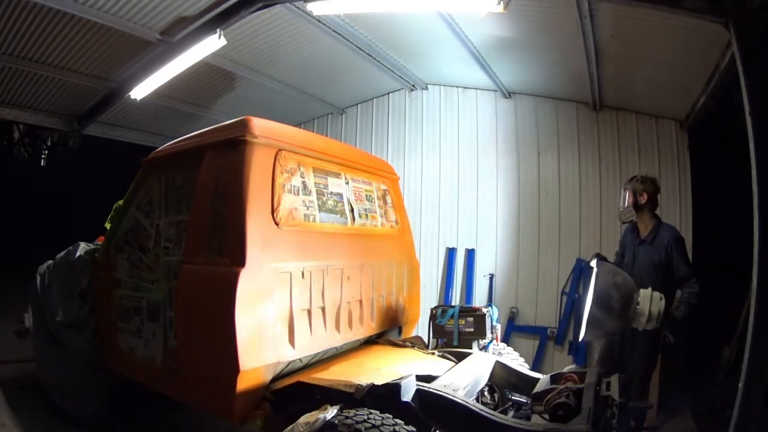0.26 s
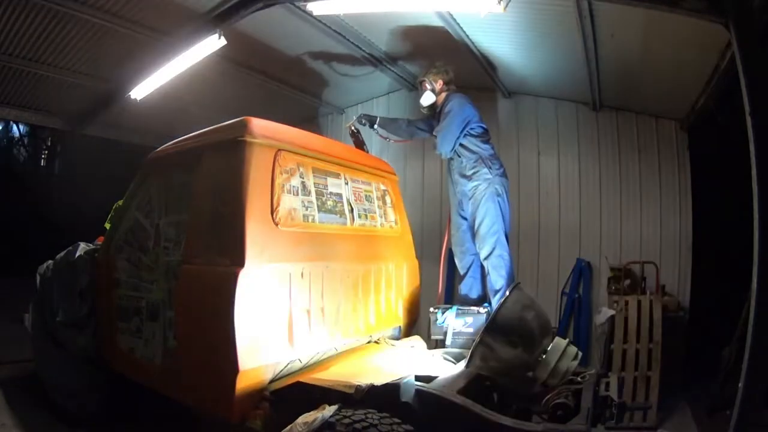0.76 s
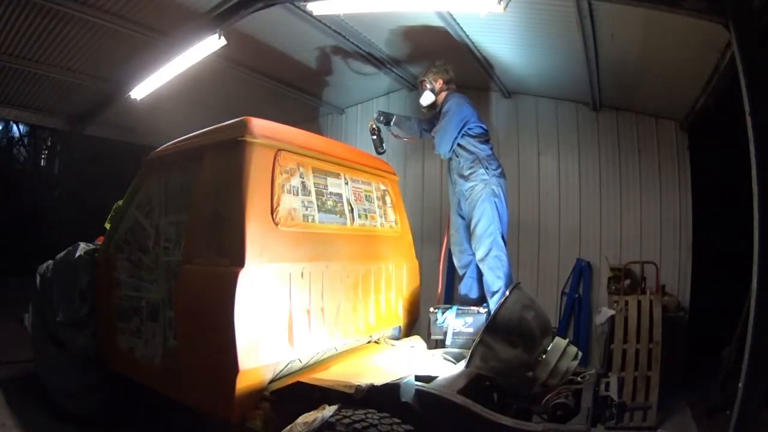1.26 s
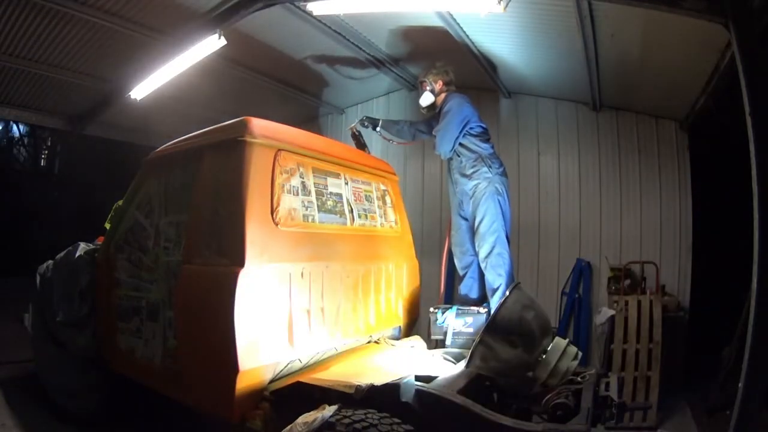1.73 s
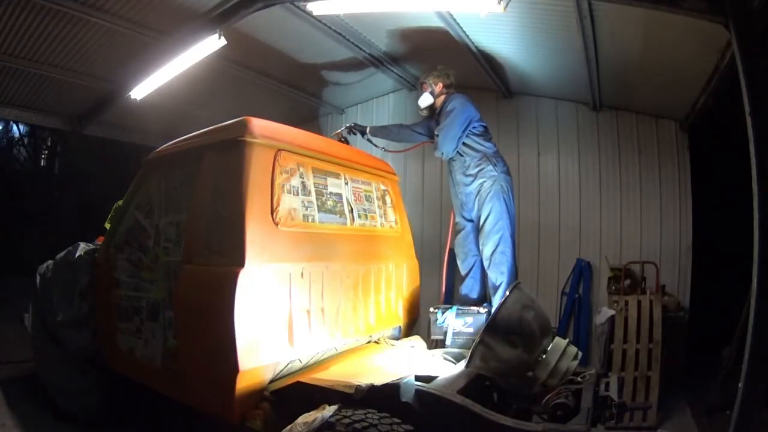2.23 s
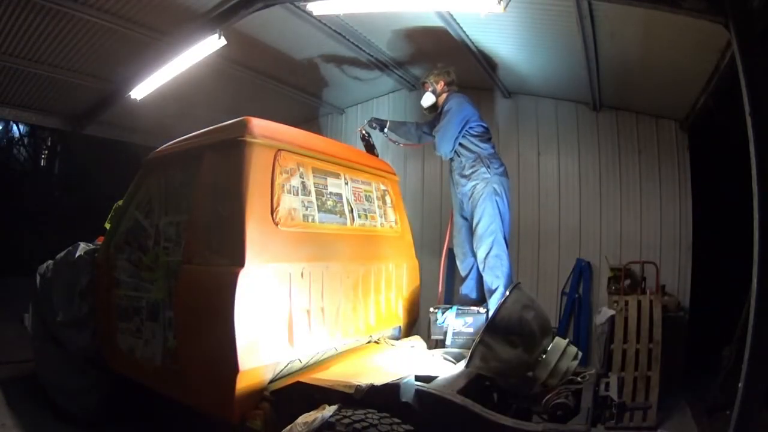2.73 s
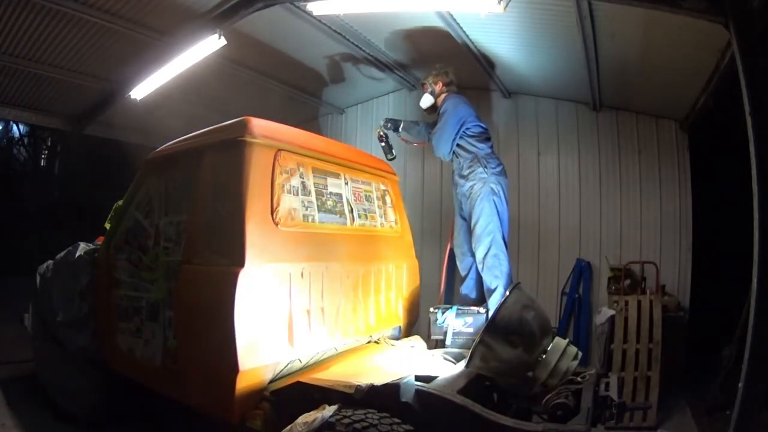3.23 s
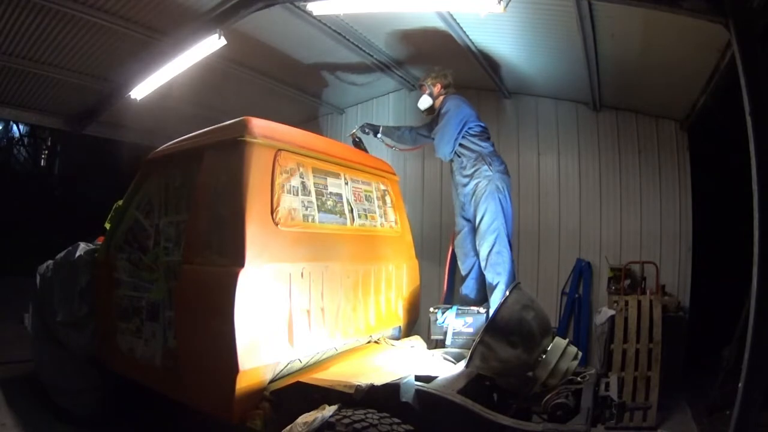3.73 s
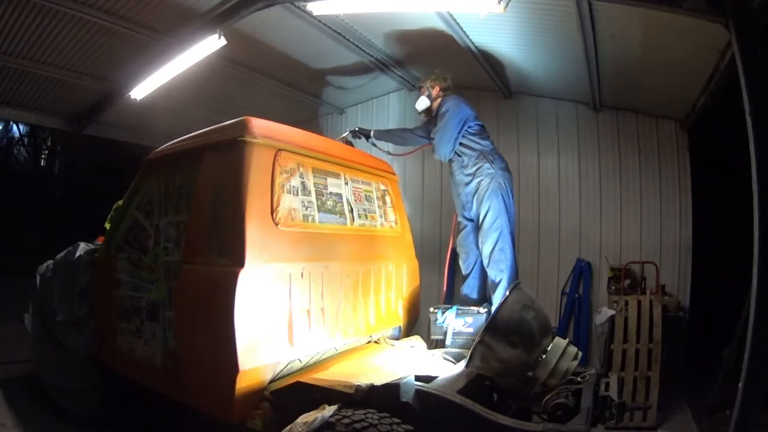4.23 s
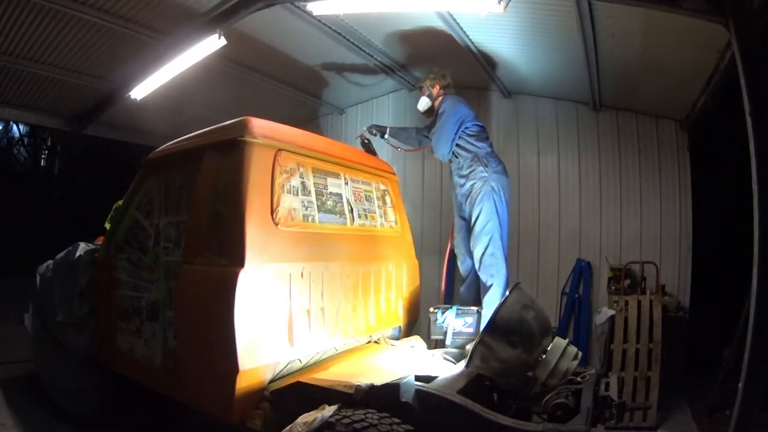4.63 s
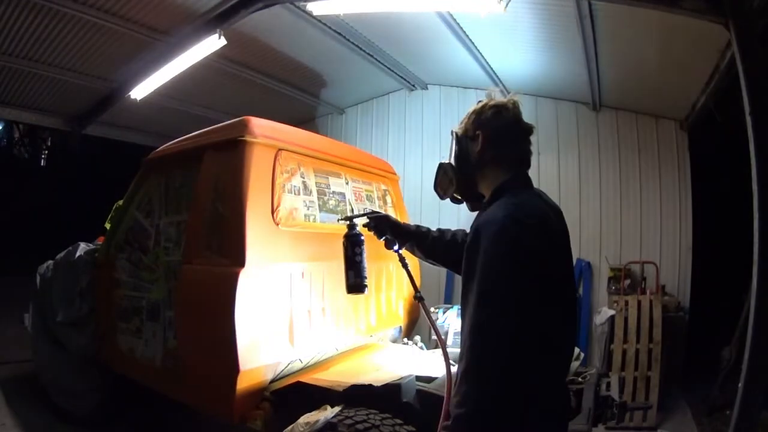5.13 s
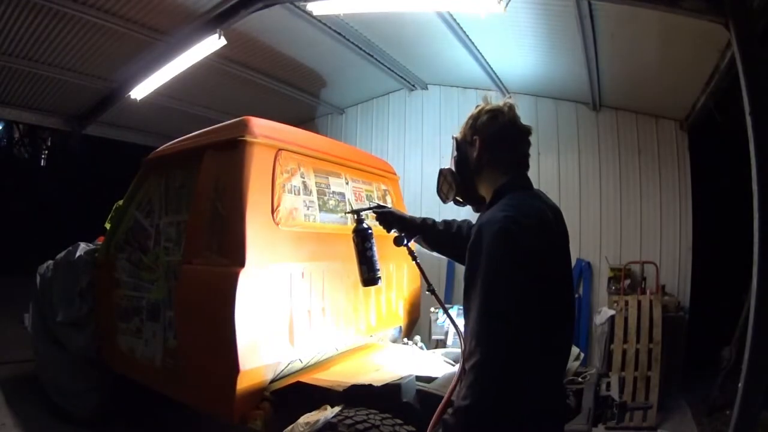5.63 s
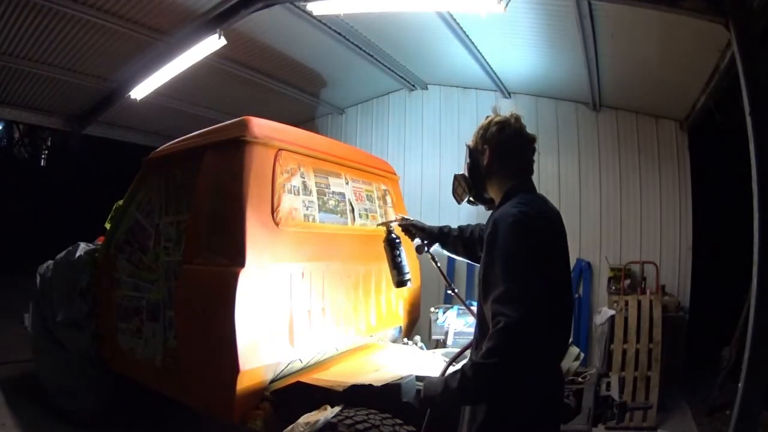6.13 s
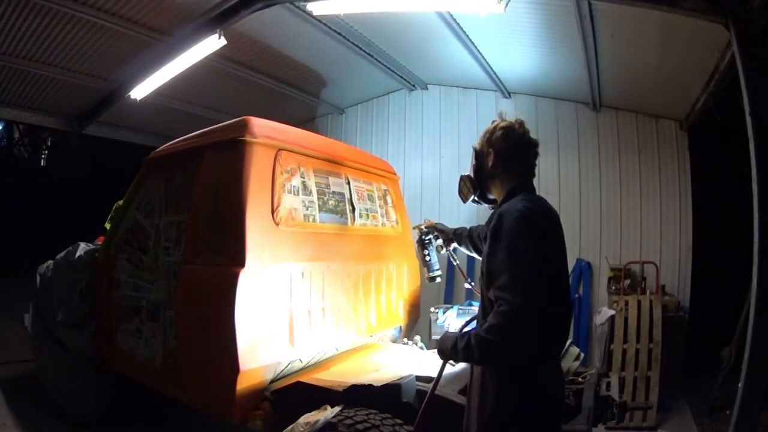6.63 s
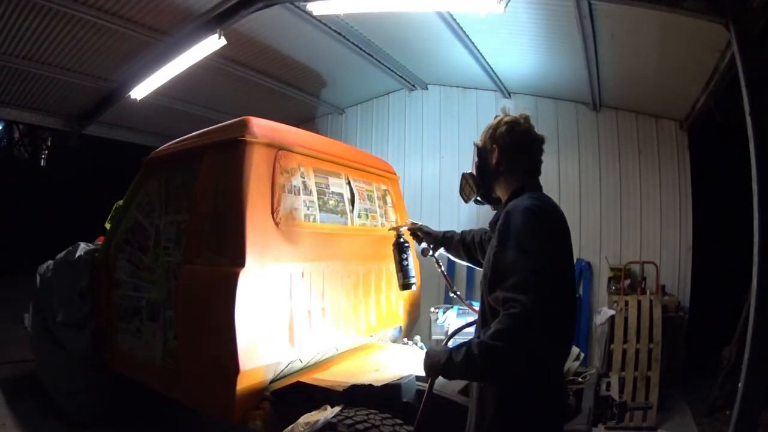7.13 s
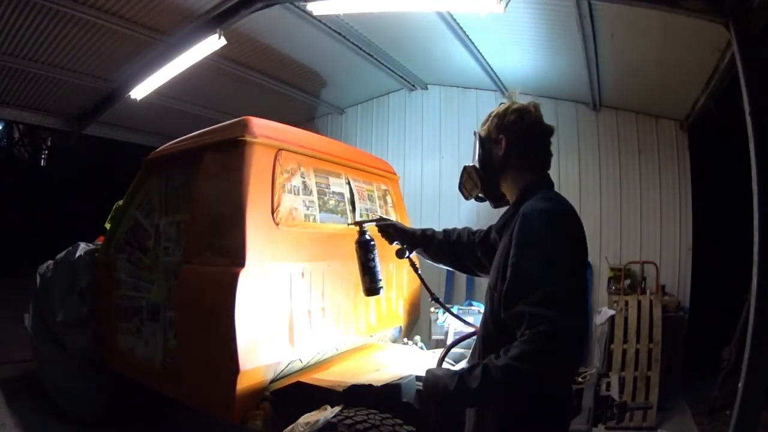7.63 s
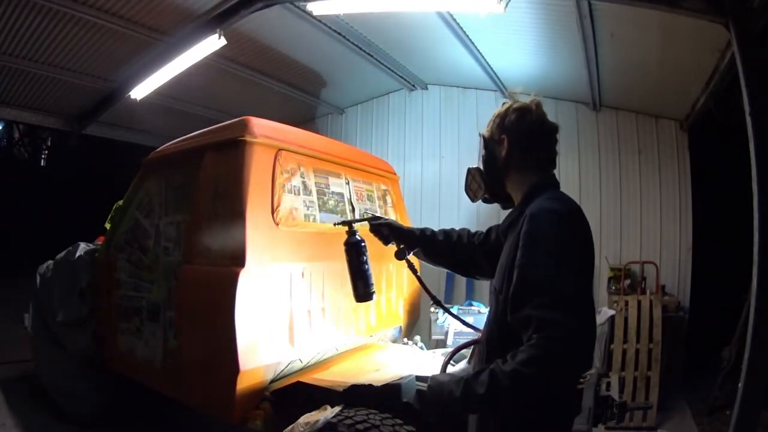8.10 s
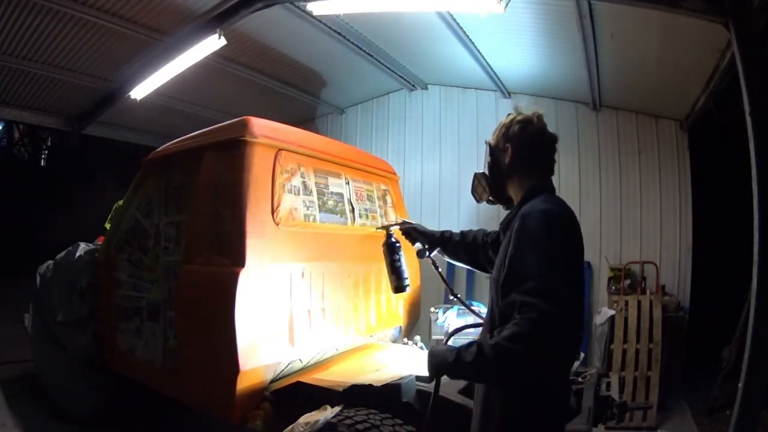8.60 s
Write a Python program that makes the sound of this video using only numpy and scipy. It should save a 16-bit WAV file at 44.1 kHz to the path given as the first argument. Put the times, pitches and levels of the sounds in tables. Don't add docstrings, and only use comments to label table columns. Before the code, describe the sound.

In a tin shed at night, crickets trill over faint rumble for a little over half a second. Then a spray gun fires loud, airy hisses, each opening with a small surge and stopping cleanly, with short gaps between. Five bursts come in one shot, a brief silence follows, then crickets and three longer bursts closer to a metal panel. Short metallic room ring, slightly wide stereo, top treble cut.

```python
import sys
import numpy as np
from scipy import signal
from scipy.fft import rfft, irfft
from scipy.io import wavfile
from scipy.ndimage import uniform_filter1d, map_coordinates

SR = 44100
rng = np.random.default_rng(int(sys.argv[2]) if len(sys.argv) > 2 else 0)


def waveform_to_disk(signal):
    frames = np.transpose(np.atleast_2d(signal))
    scaled = np.clip(frames, -1, 1) * 32767
    samples = np.round(scaled).astype(np.int16)
    wavfile.write(sys.argv[1], SR, samples)


def boost_factor(decibels):
    exponent = np.asarray(decibels, float) / 20
    return 10 ** exponent


N = 390726
T = np.arange(N) / SR
HZ = np.maximum(np.arange(N // 2 + 1) * SR / N, 1)

# stop_s, return_s, fade_in_s
CUTS = [
    (.611, .682, .016),
    (5.0515, 5.115, .03),
]
# time_s, place_along_van_m
ARM = [(0, 0), (.7, 0), (1.15, .3), (2.15, -.3), (3.1, .3), (4.1, -.3), (5.05, .35), (5.4, -.46),
       (5.81, -.12), (6.17, .13), (6.53, .35), (6.95, .33), (7.37, .05), (7.78, -.3), (8.09, -.45),
       (8.4, -.2), (8.86, .2)]


def valve(paint):
    # pulled_s, released_s, opening_s, paint_delay_s, jet_db
    trigger = [(0.664, 1.124, 0.018, 0.0018, -20), (1.296, 2.098, 0.0082, 0.006, -20.5),
               (2.257, 3.016, 0.018, 0.0041, -20.5), (3.219, 4.044, 0.018, 0, -20.5),
               (4.225, 4.982, 0.018, 0.0012, -20), (5.403, 6.545, 0.0094, 0.006, -19.5),
               (6.696, 7.802, 0.0091, 0.0013, -19.5), (8.036, 9.0, 0.016, 0.008, -19.5)]
    shut_s, surge_db, surge_s = 0.013, 5, 0.026
    flow = np.zeros(N)
    for on, off, opening, lag, db in trigger:
        since = T - on - paint * lag
        surge = surge_db * np.exp(-np.maximum(since, 0) / surge_s)
        rise = np.clip(since / opening, 0, 1) ** 2 * boost_factor(db + surge)
        flow += rise * np.exp(-np.maximum(T - off, 0) / shut_s)
    return flow


def gun():
    # frequency_hz, density_db (per Hz)
    jet_spectrum = [(150, -57), (250, -27.5), (354, -32.5), (402, -25), (552, -26), (636, -22.5),
                    (1930, -13), (6120, -2), (8400, -5.5), (11000, -4.5), (14300, -37), (22000, -120)]
    split_hz = [1900, 4000, 8000]
    # nozzle_fizz_db, panel_wash_db, paint_splatter_db
    parts = [(-5, -13, -27), (-5, -13.5, -24.5), (-5.5, -12.8, -24)]
    fizz_db, wash_db, paint_db = per_shot(parts)
    eddies = boost_factor(1.83 * walk(900))
    edges = [1] + split_hz + [SR]
    ranges = []
    for lo_hz, hi_hz in zip(edges, edges[1:]):
        noise = colour(rng.standard_normal(N) * eddies, jet_spectrum)
        flutter = boost_factor(0.78 * walk(9))
        ranges.append(level(band(noise, lo_hz, hi_hz), 0) * flutter)
    paint, wash, jet, fizz = ranges
    air = boost_factor(-5.0) * jet + boost_factor(fizz_db - 2.0) * fizz + boost_factor(wash_db - 4.0) * wash
    return valve(0) * air + valve(0.89) * boost_factor(paint_db - 1.0) * paint


def panel(x):
    # shortest_extra_path_ms, growth_ms_per_m2 (from the facing place), strength (0-1)
    bounce = [(2.7, 0, .3), (2.6, .5, .28), (1.09, 1.35, .75)]
    facing_m, weaker_per_ms, from_hz = .35, .25, 2200
    shortest_ms, growth, strength = per_shot(bounce)
    extra_ms = growth * (curves([ARM])[0] - facing_m) ** 2
    strength = strength - weaker_per_ms * extra_ms
    treble = signal.sosfilt(signal.butter(1, from_hz, "high", fs=SR, output="sos"), x)
    echo = .82 * strength * delay(treble, shortest_ms + extra_ms)
    return (x + echo) / np.sqrt(1 + .55 * strength ** 2)


def shed(x):
    walls, sound_m_s = 8, 343
    swing = 2.2
    place_m = swing * curves([ARM])[0]
    heard = []
    for facing in np.linspace(-1, 1, walls):
        path_m = 2 - place_m * facing
        heard.append(delay(x, 1000 * path_m / sound_m_s))
    return [sum(ring(h) for h in heard) / np.sqrt(walls) for _ in ("mid", "side")]


def ring(x):
    t60_s, treble_t60_s = 0.39, 0.29
    t, cut = T[:SR // 2], int(CUTS[-1][1] * SR)
    noise = rng.standard_normal(len(t))
    dull = signal.sosfilt(signal.butter(2, 4800, fs=SR, output="sos"), noise)
    tail = dull * boost_factor(-60 * t / t60_s) + (noise - dull) * boost_factor(-60 * t / treble_t60_s)
    tail = tail * np.clip(t / 0.0017, 0, 1)
    tail = tail / np.sqrt(np.sum(tail ** 2))
    return np.concatenate([signal.fftconvolve(part, tail)[:len(part)] for part in (x[:cut], x[cut:])])


def crickets():
    # time_s, level_db
    chorus = [
        [(0, -44), (.08, -41.5), (.21, -45), (.33, -41.5), (.41, -45), (.55, -42.5), (.62, -43.5), (1.25, -45),
         (5.05, -46), (5.14, -45), (5.2, -43.5), (5.28, -46), (5.32, -43.5), (5.39, -45), (6.0, -49),
         (6.67, -49.5), (7.97, -47), (8.86, -49)],
    ]
    # wing_note_hz, strokes_per_s, level_db
    singers = [(1865, 74, -5), (1925, 99, -1), (1980, 130, -2), (2040, 101, 0), (2100, 109, -3),
               (2160, 82, -9)]
    overtone_db = [-30, -34]
    stroke_s = .003
    out = np.zeros(N)
    for hz, rate, db in singers:
        phase = np.cumsum(rate * (1 + .07 * walk(25))) / SR + rng.random()
        since = (phase % 1 - .5) / rate
        size, slip = rng.standard_normal((N // 50, 2))[phase.astype(int)].T
        note = 2 * np.pi * np.cumsum(hz * (1 + .009 * walk(12))) / SR + .8 * slip
        wing = np.sin(note)
        for k, d in enumerate(overtone_db):
            wing = wing + boost_factor(d) * np.sin((k + 2) * note)
        swell = boost_factor(db + 3 * walk(9) + 1.8 * size)
        stroke = np.exp(-.5 * (since / stroke_s) ** 2) * np.cos(np.pi * since * rate)
        out += swell * stroke * wing
    return level(out, 0) * boost_factor(curves(chorus)[0])


def puffs():
    # start_s, end_s, centre_hz, width_hz, level_db
    small_sounds = [
        (.004, 0.036, 7160, 330, -59.5),
        (0.535, 0.58, 3300, 905, -51.5),
        (0.535, 0.59, 7000, 3000, -58.5),
        (5.39, 5.8, 6530, 3000, -55),
        (.66, 5.06, 300, 220, -64),
        (5.1, 8.5, 332, 260, -59),
    ]
    # centre_hz, width_hz, level_db, fading_s
    old_ring = (7004, 3001, -61, 0.3)
    hz, width_hz, db, fading_s = old_ring
    since = T - CUTS[-1][1]
    out = (since > 0) * np.exp(-np.abs(since) / fading_s) * level(hump(hz, width_hz), db)
    for on, off, hz, width_hz, db in small_sounds:
        fade = np.exp(-np.maximum(T - off, 0) / .014)
        gate = np.clip((T - on) / .004, 0, 1) * fade
        out += gate * level(hump(hz, width_hz), db)
    return out


def night():
    # frequency_hz, density_db (per Hz)
    air_spectrum = [(20, -32), (35, -11), (70, -6), (160, -10), (400, -10.5), (1400, -18.5), (2450, -17.5),
                    (3400, -30), (4100, -29), (4700, -36), (6000, -33.5), (11000, -40), (14000, -72)]
    # rumble_db, still_air_hiss_db
    shots = [(-54, -54.5), (-62.5, -53), (-64.5, -55)]
    # time_s, level_db, half_length_s
    knocks = [(0.1, -52.5, .1), (5.3, -57.5, .12)]
    # time_s, drone_db
    machine = [(0, -58), (.6, -68), (1.8, -54.5), (2.9, -62.5), (3.6, -68.5), (5.05, -62), (5.14, -53),
               (5.4, -62), (6.3, -71), (7.3, -63), (8.86, -65.5)]
    rumble_db, hiss_db = per_shot(shots)
    gusts = sum(boost_factor(db) * np.exp(-.5 * ((T - s) / half) ** 2) for s, db, half in knocks)
    air = colour(rng.standard_normal(N), air_spectrum)
    rumble = level(band(air, 1, 150), 0) * np.hypot(boost_factor(rumble_db), gusts) * boost_factor(1.5 * walk(5))
    drone = level(hump(194, 27), 0) * boost_factor(curves([machine])[0])
    hiss = level(band(air, 183, SR), 0) * boost_factor(hiss_db + 0.44 * walk(5.3))
    return rumble + drone + hiss


def level(x, db):
    return x * boost_factor(db) / np.sqrt(np.mean(x ** 2))


def curves(tables):
    s, *columns = np.concatenate(tables).T
    return [np.interp(T, s, c) for c in columns]


def per_shot(table):
    shot = np.searchsorted([back for stop, back, fade in CUTS], T)
    return np.array(table)[shot].T


def colour(x, points):
    hz, db = np.transpose(points)
    return irfft(rfft(x) * boost_factor(np.interp(np.log(HZ), np.log(hz), db)), N)


def band(x, lo_hz, hi_hz):
    power = 1 / (1 + (HZ / hi_hz) ** 8) - 1 / (1 + (HZ / lo_hz) ** 8)
    return irfft(rfft(x) * np.sqrt(power), N)


def hump(hz, width_hz):
    bell = np.exp(-.5 * ((HZ - hz) / width_hz) ** 2)
    return irfft(rfft(rng.standard_normal(N)) * bell, N)


def walk(rate):
    k = int(SR / rate)
    held = np.repeat(rng.standard_normal(N // k + 1), k)
    return 1.3 * uniform_filter1d(uniform_filter1d(held, k), k)[:N]


def delay(x, ms):
    return map_coordinates(x, [np.arange(N) - ms * SR / 1000], order=3)


def scene():
    # frequency_hz, side_minus_mid_db
    width = [(25, -10), (60, -9.5), (110, -9), (190, -7), (350, -3), (620, -1.5), (1120, -6.5),
             (2020, -8.5), (3620, -13.5), (6500, -17), (11700, -16)]
    jet, insects = gun(), crickets() + puffs()
    near = panel(jet)
    wet_mid, wet_side = shed(.4 * near + .65 * jet)
    near = near + .16 * delay(near, 3.78)
    mid = boost_factor(-.9) * near + boost_factor(2) * wet_mid
    mid = mid + boost_factor(-2) * insects + boost_factor(-6) * ring(insects) + night()
    side = colour(boost_factor(5.0) * wet_side + boost_factor(-0.5) * ring(insects) + boost_factor(-3.0) * night(), width)
    return np.array([boost_factor(0.97) * (mid + side), boost_factor(1.2) * (mid - side)])


def band_limit(x):
    return signal.sosfilt(signal.butter(12, 12280, fs=SR, output="sos"), x)


def record(dry):
    top_hz = 10960
    rounded = np.tanh(1.1 * dry) / 1.1
    out = signal.sosfilt(signal.ellip(14, .3, 85, top_hz, fs=SR, output="sos"), rounded)
    for stop, back, fade in CUTS:
        out = out * np.where(T < stop, 1, np.clip((T - back) / fade, 0, 1))
    return band_limit(out)


dry = scene()
out = record(dry)
waveform_to_disk(out)
```